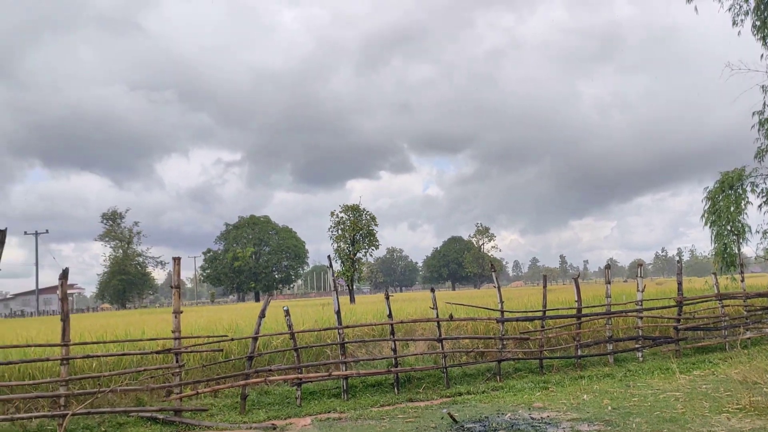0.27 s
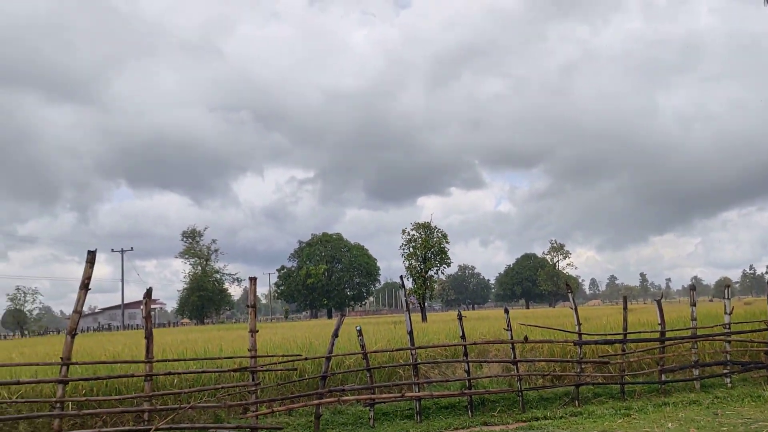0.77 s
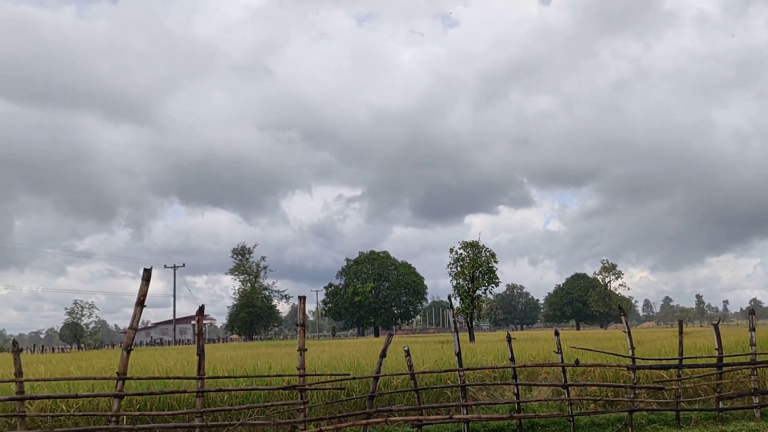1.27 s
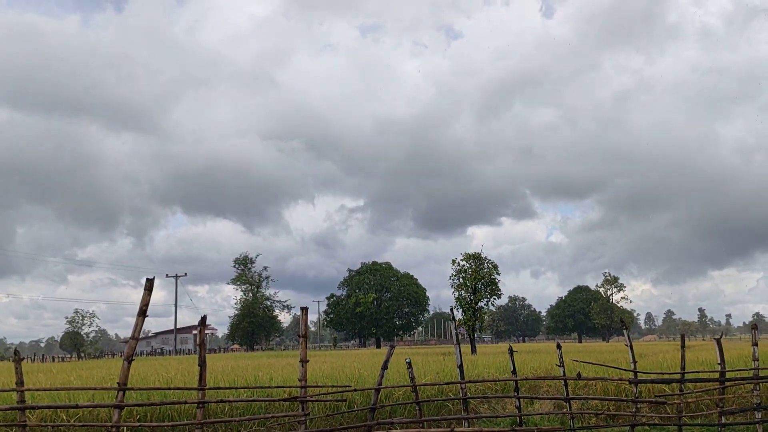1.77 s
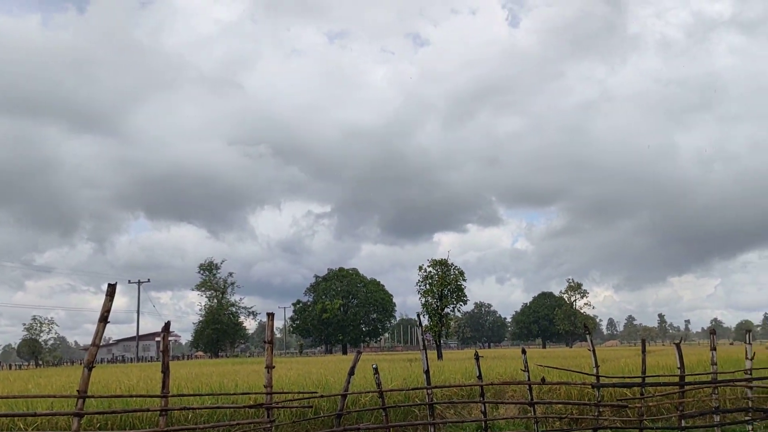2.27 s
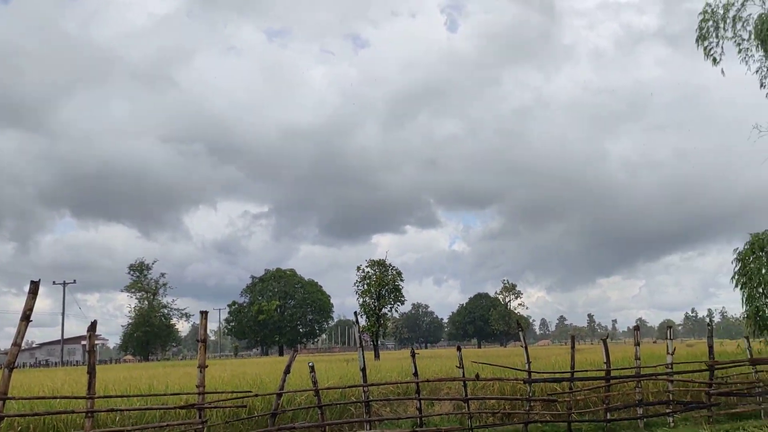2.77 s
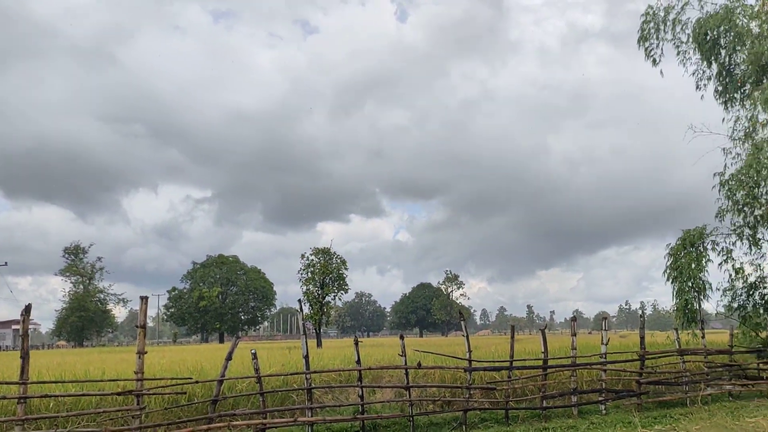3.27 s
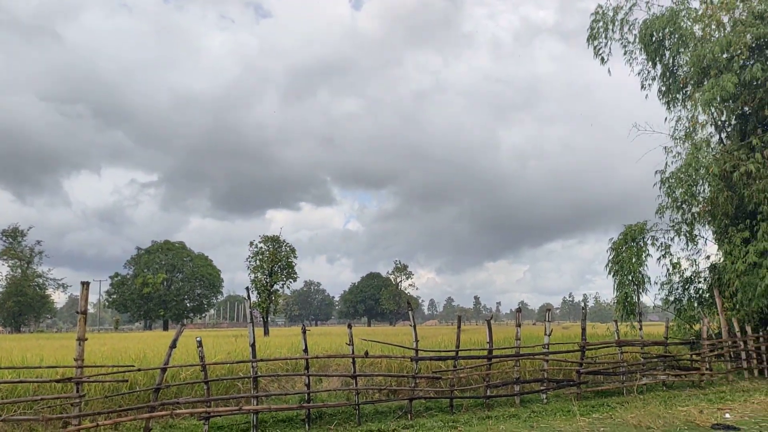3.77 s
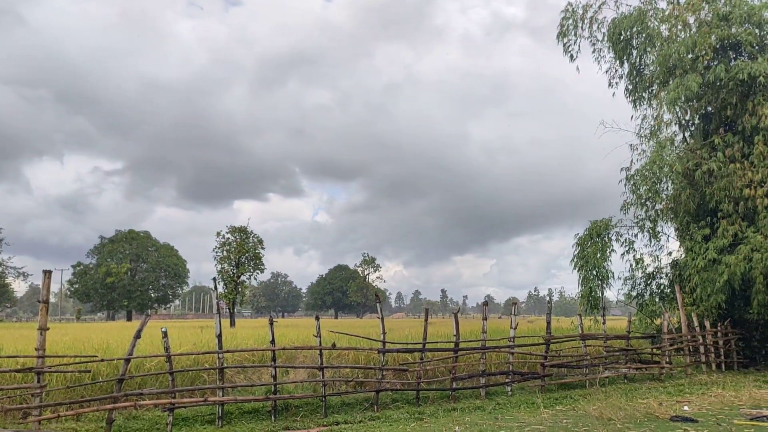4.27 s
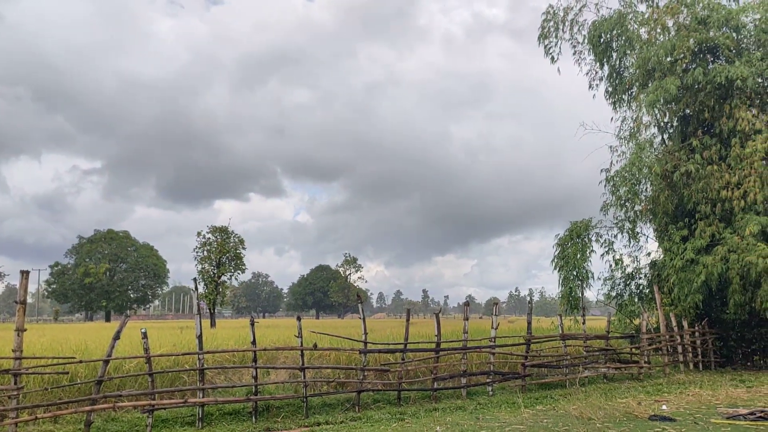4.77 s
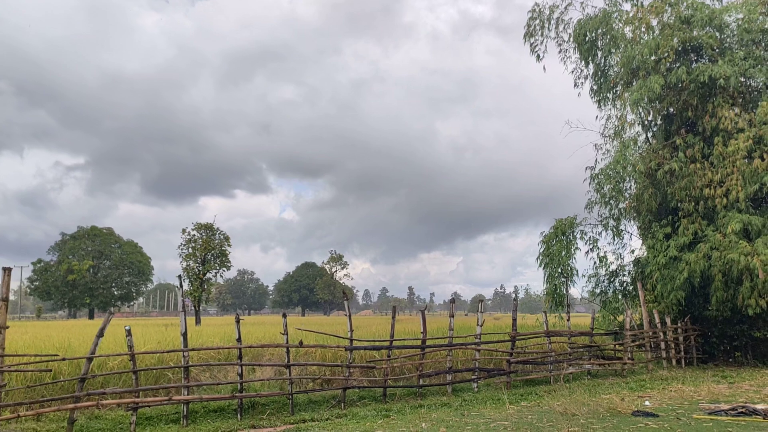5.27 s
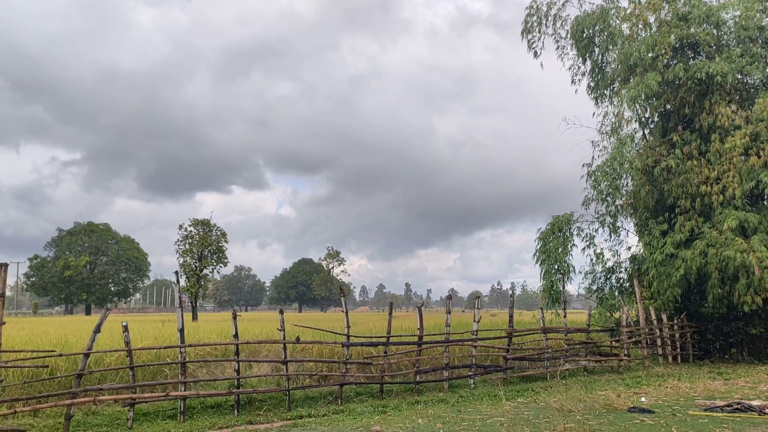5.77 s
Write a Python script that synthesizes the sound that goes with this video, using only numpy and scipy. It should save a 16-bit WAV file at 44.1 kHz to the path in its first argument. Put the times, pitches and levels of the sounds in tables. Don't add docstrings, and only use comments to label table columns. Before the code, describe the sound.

A steady rush of windblown foliage fills the whole stretch, wide and close. One low air thump comes early on the left, then leaf slaps scatter through, clustering around two seconds and hardest just before five. The setting is an open rural field; the phone's sound is dulled at the top, with a watery compressed texture.

```python
import sys
import numpy as np
from scipy import signal
from scipy.fft import rfft, irfft, dct, next_fast_len
from scipy.io import wavfile
from scipy.ndimage import uniform_filter1d

SR = 44100
rng = np.random.default_rng(int(sys.argv[2]) if len(sys.argv) > 2 else 0)


def amplitude_ratio(level_db):
    exponent = np.asarray(level_db, float) / 20
    return 10 ** exponent


def log_audio(samples):
    frames = np.atleast_2d(samples).T
    limited = np.clip(frames, -1, 1)
    pcm = np.round(limited * 32767).astype(np.int16)
    wavfile.write(sys.argv[1], SR, pcm)


N = 266231


def curve(table, at, column=1):
    table = np.array(table, float)
    return np.interp(np.log(at + 1), np.log(table[:, 0]), table[:, column])


def walk(rate):
    hold = int(SR / rate)
    levels = np.repeat(rng.standard_normal(N // hold + 1), hold)
    smooth = uniform_filter1d(uniform_filter1d(levels, hold), hold)
    return 0.76 * smooth[:N]


# (time [s], level [dB], pitch [Hz], length [s])
EDDY_THUMPS = [
    (0.739, -24, 40.6, 0.035),
    (1.056, -41.5, 30, 0.048),
    (1.465, -43, 45, .02),
    (2.04, -39, 35, 0.037),
    (4.1, -44, 30, 0.034),
    (4.932, -49, 55, 0.0091),
    (5.685, -48, 35, .03),
]


def eddies():
    t = np.arange(N) / SR
    low_band = signal.butter(2, [22, 85], "band", fs=SR, output="sos")
    rumble = signal.sosfilt(low_band, rng.standard_normal((2, N)))
    rumble[1] = 1.3 * rumble[0] + 0.66 * rumble[1]
    flutter_db = 13 * walk(12)
    out = amplitude_ratio(-41.5 + flutter_db) * rumble * amplitude_ratio([[0], [-5]])
    for s, db, hz, length in EDDY_THUMPS:
        swell = np.exp(-((t - s) / length) ** 2)
        out[0] -= amplitude_ratio(db) * np.sin(2 * np.pi * hz * (t - s)) * swell
    return out


# (time [s], peak level [dB], colour [Hz], left minus right [dB])
LEAF_SLAPS = [(0.2274, -26, 5360, -5), (0.9334, -22.5, 5520, -4), (1.5801, -16.5, 4800, -5.5),
              (1.618, -24.5, 2670, -6), (1.9172, -19.5, 5460, -7), (1.9834, -19, 5080, -8),
              (2.0066, -19, 4700, -5), (2.2626, -17.5, 4600, 3.5), (2.6053, -23, 4730, -5),
              (2.6584, -17, 4940, -2), (2.9569, -19.5, 4820, -6), (3.353, -18, 4700, -7),
              (3.3899, -21, 4730, -3), (3.5404, -24, 5030, -11), (4.1777, -18.5, 5460, -5),
              (4.3896, -21, 5240, -4), (4.6134, -20.5, 4800, -14), (4.623, -33, 5520, -8),
              (4.6475, -17.5, 4220, -4.5), (4.6597, -23, 5030, -8), (4.7367, -11, 3440, 3),
              (4.7486, -13.5, 5800, 1), (4.757, -20, 5420, -6), (4.799, -21.5, 4260, -14.5),
              (4.8258, -20.5, 4900, -3), (5.288, -29, 4830, -4), (5.6376, -16, 5800, -1.5),
              (5.906, -24, 3920, 0), (6.0355, -15.5, 5430, -8)]


def one_slap(db, hz):
    t = np.arange(SR // 4) / SR
    ring_s = 0.085
    noise = rng.standard_normal((3, len(t)))
    spiky = noise[:2] * amplitude_ratio(12 * uniform_filter1d(noise[2], size=30))
    fall = (1 - np.exp(-t / 0.0029)) * np.exp(-np.log(1000) * t / ring_s)
    crack = np.clip((db + 24) / 11, 0.1, 1.4) ** 2 * np.exp(-t / 0.0022)
    burst = 0.7 * spiky * fall + noise[:2] * crack
    body = signal.lfilter(*signal.butter(1, [hz * 0.75, hz * 1.3], "band", fs=SR), burst)
    wide = signal.lfilter(*signal.butter(2, 2300, "high", fs=SR), burst)
    fine = signal.lfilter(*signal.butter(2, [7500, 13500], "band", fs=SR), burst)
    fine_db = -11 - 4 * np.log2(hz / 4800)
    return amplitude_ratio(db + 25.5) * (body + 0.52 * wide + amplitude_ratio(fine_db) * fine)


def slaps():
    out = np.zeros((2, N + SR))
    for s, db, hz, pan_db in LEAF_SLAPS:
        left, right = one_slap(db, hz)
        start = int(s * SR)
        late = start + 40
        out[0, late:late + len(left)] += amplitude_ratio(pan_db / 2) * left
        out[1, start:start + len(right)] += amplitude_ratio(-pan_db / 2) * right
    return out[:, :N]


def ticks(rate, db, spread_db):
    chance = rng.random((2, N))
    strength = amplitude_ratio(db + spread_db * np.minimum(-np.log(chance[1] + 1e-9), 5.0))
    hits = (chance[0] < rate / SR) * strength
    rattle_s = 0.0011
    rattle = signal.lfilter([1], [1, -np.exp(-1 / (rattle_s * SR))], hits)
    return rattle * rng.standard_normal(N)


# (frequency [Hz], in-phase part [-1..1], part a quarter wave apart [-1..1])
PORTS_ALIKE = [(60, 1, -0.18), (150, 1, 0.15), (283, 0.94, 0.1), (389, .66, .2), (539, 0.47, 0.52),
               (596, 0.6, 0.042), (800, 0, 0.073), (1004, -0.62, -0.2), (1483, -0.27, -0.014),
               (1646, 0.18, -.1), (2160, -.25, 0), (2717, .22, 0), (3540, -.08, 0), (4530, 0, 0)]


def ports(a, b, hz):
    alike = curve(PORTS_ALIKE, hz) + 1j * curve(PORTS_ALIKE, hz, column=2)
    alike = alike / np.maximum(np.abs(alike) / 0.995, 1)
    half = np.arccos(np.abs(alike)) / 2
    turn = np.exp(-1j * np.angle(alike))
    left = np.cos(half) * a + np.sin(half) * b
    right = (np.cos(half) * a - np.sin(half) * b) * turn
    return np.array([left, right])


# (time [s], level [dB])
WIND_GUST = [
    (0.0, -32),
    (0.76, -30.5),
    (2.02, -30),
    (4.4, -30.5),
    (4.74, -30),
    (6.04, -30),
]
# (frequency [Hz], rise [dB per gust dB], flicker [dB])
LEAF_ANSWER = [
    (62, 4, 5),
    (248, 1.8, 1.37),
    (1590, 1.44, 1.4),
    (4500, 1.3, 1.5),
    (11000, 1.5, 2.4),
]


def foliage(size):
    hz = np.fft.rfftfreq(size, 1 / SR)
    hiss = rfft(rng.standard_normal((2, N)), size)
    contacts = np.array([ticks(rate=250, db=-7, spread_db=2.57) for _ in range(2)])
    grain = rfft(contacts, size) * np.clip(hz / 3000, 0, 1.2)
    pair = ports(*(hiss + grain), hz)
    s, gust_db = np.transpose(WIND_GUST)
    gust_db = np.interp(np.arange(N) / SR, s, gust_db - np.mean(gust_db))
    out, shared, sway = 0, walk(5.8), walk(6.1)
    for half_octave in np.arange(-12, 10):
        centre = 1000 * 2 ** (half_octave / 2)
        distance = np.clip(2 * np.log2((hz + 1) / centre), -1, 1)
        band = np.cos(np.pi / 2 * distance) ** 2
        shared = 0.65 * shared + 0.45 * walk(9)
        flicker_db = curve(LEAF_ANSWER, centre, column=2)
        db = curve(LEAF_ANSWER, centre) * gust_db + flicker_db * (shared + 1.14 * walk(22))
        tilt_db = 0.18 * flicker_db * sway * np.array([[1], [-1]])
        out = out + amplitude_ratio(db + tilt_db) * irfft(pair * band, size)[:, :N]
    return out


# (frequency [Hz], level [dB per Hz])
LEFT_RUSH = [(24, -95), (70, -81.5), (120, -72), (195, -62), (470, -65.5), (1020, -67), (1820, -65.5),
             (3750, -69.5), (5050, -73.5), (6950, -79), (8350, -93), (10900, -93), (12100, -97),
             (14100, -97.5), (15400, -105)]
# (frequency [Hz], extra level [dB])
RIGHT_CAVITY = [(41, 8), (125, 1), (2350, -1), (3550, 4.5), (5050, 12.5), (6150, 11.5), (7250, -0.5),
                (9600, -1), (11800, 3), (13400, -1.5)]
# (frequency [Hz], width [Hz], depth [dB])
TREBLE_GAPS = [
    (6630, 80, -5.5),
    (7390, 52, -14.5),
    (8130, 190, -9),
]


def colour(hz):
    left_db = curve(LEFT_RUSH, hz)
    for centre, width, depth_db in TREBLE_GAPS:
        left_db = left_db + depth_db / (1 + ((hz - centre) / width) ** 2)
    right_db = left_db + curve(RIGHT_CAVITY, hz)
    return amplitude_ratio(np.array([left_db, right_db])) * np.sqrt(SR / 2)


def scene():
    size = next_fast_len(N)
    hz = np.fft.rfftfreq(size, 1 / SR)
    leaves = rfft(foliage(size) + slaps(), size)
    return irfft(leaves * colour(hz), size)[:, :N] + eddies()


FRAME, GRID = 1024, 552
# (frequency [Hz], step over band level [dB], dropped when this far under its partner [dB])
STORAGE_STEPS = [(150, -20, 23), (400, -18, 15), (800, -15, 8), (1100, -13, 5), (1600, -13, 6),
                 (2500, -10, 3.6), (3800, -13, 8), (5200, -13, 15), (6400, -3, 13), (7300, 8, 8),
                 (9000, 10.5, 8), (11500, 9, 8), (13500, 8.5, 8), (15200, 13.5, 8)]


def frame_windows(count):
    soft = np.sin(np.pi * (np.arange(2 * FRAME) + 0.5) / (2 * FRAME))
    steep = signal.windows.kaiser_bessel_derived(2 * FRAME, 4 * np.pi)
    fades = np.array([soft, steep])[:, :FRAME]
    choice = uniform_filter1d(rng.standard_normal(count + 1), size=5) > 0.05
    rise = fades[choice * 1]
    return np.hstack([rise[:-1], rise[1:, ::-1]])


def rounding_step_db(own_db, apart, jealous, patchy_db, hurry_db):
    own_db = uniform_filter1d(uniform_filter1d(own_db, size=9, axis=1), size=3, axis=2)
    luck = uniform_filter1d(rng.standard_normal(own_db.shape), size=3, axis=1) * np.sqrt(3)
    luck = np.maximum(luck + np.roll(luck, 1, axis=2), 0) ** 2 / 2
    hurry = uniform_filter1d(rng.standard_normal((own_db.shape[1], 1)), size=4, axis=0) * 2
    hidden_db = np.clip(jealous * (own_db[::-1] - own_db), 0, np.where(apart, 12, 21))
    return own_db + hidden_db + patchy_db * luck + hurry_db * hurry


def thrifty(x, jealous, patchy_db, hurry_db):
    count = N // FRAME + 3
    window = frame_windows(count)
    padded = np.pad(x, ((0, 0), (2 * FRAME - GRID, 3 * FRAME)))
    places = np.arange(count)[:, None] * FRAME + np.arange(2 * FRAME)
    a, b, c, d = np.split(padded[:, places] * window, 4, axis=2)
    lines = dct(np.dstack([-c[..., ::-1] - d, a - b[..., ::-1]]), type=4, norm="ortho")
    hz = (np.arange(FRAME) + 0.5) * SR / (2 * FRAME)
    apart = (hz > 4000) & (hz < 6700)

    def swap(v):
        return np.where(apart, v, np.array([v[0] + v[1], v[0] - v[1]]) / np.sqrt(2))

    lines = swap(lines)
    edges = np.r_[0:64:4, 64:FRAME:8]
    band = np.searchsorted(edges, np.arange(FRAME), "right") - 1
    power = np.add.reduceat(lines ** 2, edges, axis=2) / np.bincount(band)
    own_db = 10 * np.log10(power + 1e-20)
    now_db = uniform_filter1d(own_db, size=2, axis=1)
    lost = (now_db[::-1] - now_db)[..., band] > curve(STORAGE_STEPS, hz, column=2)
    step_db = rounding_step_db(own_db, apart[edges], jealous, patchy_db, hurry_db)
    step = amplitude_ratio(step_db[..., band] + curve(STORAGE_STEPS, hz))
    whole = np.floor(np.abs(lines / step) ** 0.75 + 0.4054)
    kept = ~lost * np.sign(lines) * step * whole ** (4 / 3)
    late, early = np.split(dct(swap(kept), type=4, norm="ortho"), 2, axis=2)
    frames = np.dstack([early, -early[..., ::-1], -late[..., ::-1], -late]) * window
    joined = frames[:, 1:, :FRAME] + frames[:, :-1, FRAME:]
    return joined.reshape(2, -1)[:, FRAME - GRID:FRAME - GRID + N]


def low_pass(x):
    return signal.sosfilt(signal.butter(12, 15640, fs=SR, output="sos"), x)


def record(dry):
    stored = thrifty(dry, jealous=1.3, patchy_db=5.5, hurry_db=0.6)
    return low_pass(stored)


dry = scene()
out = record(dry)
log_audio(out)
```